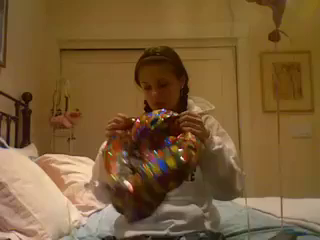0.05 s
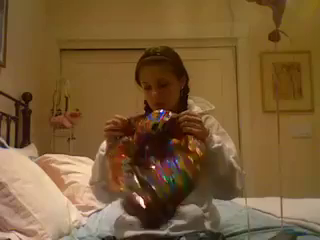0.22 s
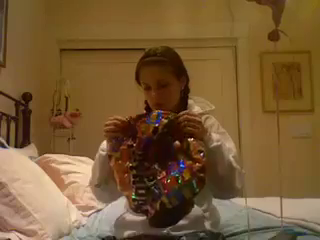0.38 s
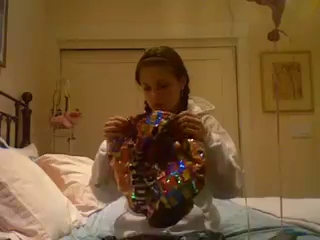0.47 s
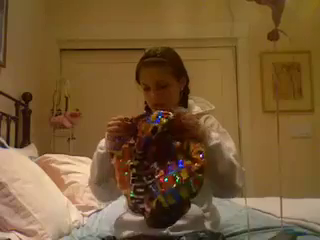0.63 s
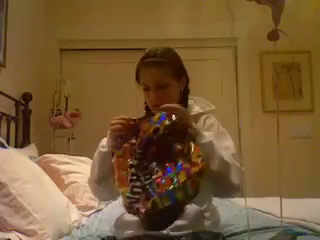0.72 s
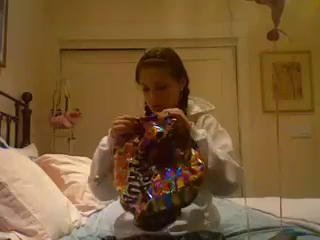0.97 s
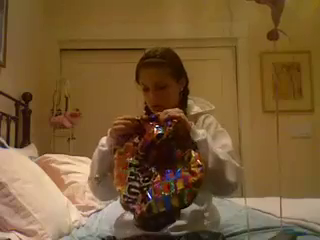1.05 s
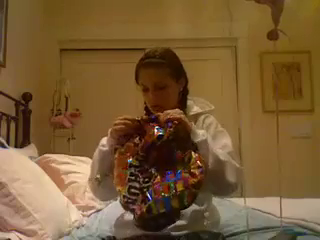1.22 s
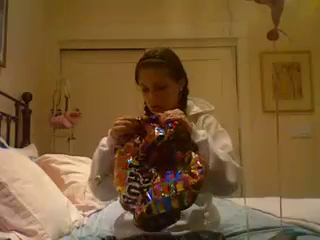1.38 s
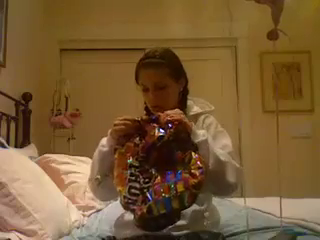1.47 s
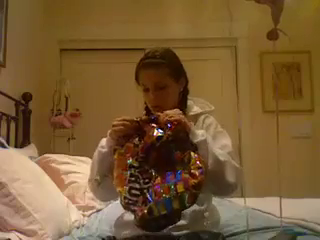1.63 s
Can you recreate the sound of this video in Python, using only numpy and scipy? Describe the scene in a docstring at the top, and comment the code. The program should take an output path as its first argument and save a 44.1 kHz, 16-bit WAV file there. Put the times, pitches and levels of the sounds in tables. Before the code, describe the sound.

Close, bright crinkling comes from a limp foil balloon being turned over in a small bedroom. Three quick bursts of crackles and snaps thin out to stray ticks, with faint room hiss and a thin, pulsing whine underneath.

```python
"""In a small bedroom, a deflated foil balloon is turned over and squeezed three times, close by.
Creases buckle and release their strain as sharp snaps, over a dense crackle of tiny folds.
Taut facets ping as they relax, and the slack skin rustles and flaps with a soft, low puff.
Underneath lie faint room noise and the thin, pulsing whine of electronics."""
import sys
import numpy as np
from scipy import signal
from scipy.fft import rfft, irfft, next_fast_len
from scipy.io import wavfile
from scipy.ndimage import uniform_filter1d

SR = 44100
rng = np.random.default_rng(int(sys.argv[2]) if len(sys.argv) > 2 else 0)


def wrap_up_sound(samples):
    """Save the sound to the file named by the first command line argument, as 16-bit audio."""
    columns = np.atleast_2d(samples).T
    # keep every value between -1 and 1, then stretch to whole-number steps
    tamed = np.clip(columns, -1, 1)
    steps = np.round(tamed * 32767).astype(np.int16)
    wavfile.write(sys.argv[1], SR, steps)


N = 74970

# Room noise and hiss. Each row: frequency in Hz, relative spectral density in dB.
NOISE_SPECTRUM = [(30, -16), (70, -11), (155, 1), (320, -2.5), (460, -6.5), (2000, -11), (4000, -14.5),
                  (7500, -20), (9500, -28), (13000, -33), (15500, -28)]
# Envelope of the pulsing whine. Each row: time in seconds, level in dB.
WHINE_LEVEL = [(0, -58), (.1, -54.5), (.17, -61.5), (.95, -64.5), (1.25, -58.5), (1.32, -63.5),
               (1.42, -55.5), (1.7, -55.5)]
# Faint wavering tones of the electronics. Each row: frequency in Hz, level in dB.
FAINT_TONES = [(12260, -86), (15230, -94)]
# Bedroom reverberation. Each row: frequency in Hz, 60 dB decay time in seconds, relative level in dB.
REVERBERATION = [(188, 0.093, -9.5), (700, 0.13, -0.5), (2000, 0.28, -8.5), (6700, 0.096, 0.5),
                 (14500, 0.13, -8)]
# How hard the hands crumple the foil. Each row: time in seconds, crackle drive in dB.
SQUEEZE_LEVEL = [(0, -55), (.03, -64), (.06, -79.5), (.222, -67), (.25, -41), (.277, -36), (.335, -37),
                 (.39, -47.5), (.425, -48.5), (.46, -44.5), (.50, -48.5), (.56, -57.5), (.64, -60),
                 (.695, -46.5), (.745, -42), (.772, -37.5), (.80, -46), (.85, -56.5), (.90, -67),
                 (.96, -68.5), (1.024, -78), (1.04, -42), (1.105, -46.5), (1.15, -42), (1.21, -52.5),
                 (1.26, -64), (1.35, -83), (1.7, -75)]
# Rustle of the broad panels. Each row: frequency in Hz, relative level in dB.
RUSTLE_SPECTRUM = [(70, -25), (190, -0.5), (430, -2.5), (720, 0), (900, -7), (1250, -2), (2500, -27.5)]
# Radiation of the foil. Each row: frequency in Hz, relative gain in dB.
FOIL_RADIATION = [(100, -37), (200, -6.5), (450, -24), (720, -8.5), (900, -13), (1400, -13.5), (1800, -0.5),
                  (2700, -1), (3500, -1), (5500, -2), (6900, -2), (9200, -4), (11500, -6.5), (12400, -11),
                  (13500, -10), (16000, -24)]
# The top treble as the foil turns. Each row: time in seconds, gain in dB.
SHEEN_GAIN = [(0, -15), (.22, -15), (.27, 0), (.56, 5), (.63, -4), (.76, 0.5), (.86, -5), (1.04, -0.5),
              (1.15, 1.5), (1.2, -17), (1.228, 11), (1.29, -6), (1.57, -8)]
# Slack panels flipping. Each row: centre in seconds, level in dB, pitch in Hz, puff width in seconds.
PANEL_FLAPS = [(0.28, -34, 650, 0.00092), (0.29, -50, 594, 0.0063), (0.305, -41, 404, 0.016),
               (0.3337, -41.5, 217, 0.021), (0.34, -44, 700, 0.0011), (.352, -46, 176, 0.0099),
               (.708, -48.5, 556, 0.012), (0.762, -41, 570, 0.003), (0.766, -39.5, 464, 0.019),
               (.775, -53, 240, 0.014), (1.141, -53, 573, 0.026), (1.671, -56.5, 436, 0.015)]
# Taut facets relaxing. Each row: start in seconds, level in dB, pitch in Hz.
FACET_PINGS = [(.091, -45.5, 3400), (.091, -51.5, 9350), (.186, -49, 4800), (.893, -49, 6430),
               (1.5415, -50, 5240), (1.574, -43, 5100), (1.573, -60, 5700), (1.574, -55, 4300)]
# Creases buckling. Each row: start in seconds, relative level in dB, ring pitch in Hz,
# ring relative to the rattle in dB, gain of the rattle's lower band in dB.
CREASE_SNAPS = [(.003, -21.5, 3180, -10, -17), (.0052, -28.5, 4150, -14, -3),
                (.0915, -37.5, 3120, -4.5, -3), (0.2231, -41, 6500, 4, 13), (0.2474, -23.5, 2640, -3, 10),
                (0.2689, -21, 2890, 9, -11), (0.2715, -18.5, 4500, -5, -18), (0.2837, -25, 4760, 1, 0),
                (0.2971, -17.5, 7250, -6, -6), (0.32, -32, 9400, 5, -11), (0.325, -32, 2420, 3, 2),
                (0.3279, -20, 5000, -24, 1), (0.339, -22.5, 6750, 7, 4), (0.345, -29, 6640, 6, -7),
                (0.3633, -19.5, 2830, -13, 5), (0.3738, -30, 2070, 5, -19), (0.3999, -23, 2620, 8, -8),
                (0.4077, -28, 6900, -1, 3), (0.44, -21, 6200, -17, -1), (0.4488, -20, 7700, -13, -3),
                (0.4552, -20.5, 8700, -4, -2), (0.4628, -20.5, 2670, -7, -3), (.4676, -18, 2860, -3, -27),
                (0.4853, -16, 2370, -6, 0), (0.4922, -20, 5400, -9, 1), (0.5135, -24.5, 3960, -1, -10),
                (.547, -29.5, 6950, -17, -9), (.556, -30, 5400, 0, -6), (.577, -14.5, 7400, -7.5, -6.5),
                (0.5837, -30, 2900, -1, -18), (.59, -18, 8900, -1.5, -6), (.6147, -26, 4230, -9, -4),
                (0.6381, -22.5, 2700, -4.5, -26), (.6524, -18.5, 7330, 6, -2), (.665, -26, 1920, 9, -9),
                (0.665, -15.5, 6770, -3.5, -3.5), (.7005, -20, 6900, -13, 3), (0.7118, -24, 2650, 0, 3),
                (0.7398, -34, 6800, 1, -16), (.7569, -7, 9200, -8, -7), (0.7685, -12, 7500, -23, -13),
                (0.821, -27, 3800, -10, -7), (.832, -32.5, 3440, -1, -10), (.847, -32.5, 4070, 4, -18),
                (0.8544, -36.5, 3480, 14, -23), (.857, -33.5, 4760, 16, -5),
                (1.029, -23.5, 2210, -4.5, -30), (1.0361, -16.5, 5700, -8, -1.5),
                (1.048, -36, 3540, -12, -2), (1.056, -27.5, 2920, 8, -2), (1.066, -22, 6640, -5, -3),
                (1.083, -29, 2980, 6, -6), (1.0944, -19.5, 4400, -21, -5), (1.1188, -26, 2820, 2, 13),
                (1.128, -34, 2800, -6, 12), (1.1402, -26, 2760, 3, 13), (1.1437, -37, 2650, -1, 10),
                (1.1555, -26, 6070, -10, 2), (1.194, -30, 4600, -3, 12), (1.225, -29, 9600, -19, -11),
                (1.279, -38.5, 8800, 15, -8), (1.306, -44, 2600, -5.5, 3), (1.5405, -32.5, 8130, -2, -22),
                (1.5735, -29.5, 7600, -1, -15), (1.5747, -26, 8840, -4, -12)]

FIRM_SQUEEZE_DB = -36  # reference for the squeeze level


def from_db(db):
    """Decibels to amplitude ratio."""
    return 10 ** (np.asarray(db) / 20)


def unit_rms(x):
    """Scale to unit mean power."""
    return x / np.sqrt(np.mean(x ** 2) + 1e-20)


def unit_energy(x):
    """Scale to unit total energy."""
    return x / np.linalg.norm(x)


def in_time(rows):
    """Interpolate a time curve at every sample."""
    return np.interp(np.arange(N) / SR, *np.transpose(rows))


def at_hz(rows, hz, column=1):
    """Interpolate a column on a log-frequency axis."""
    columns = np.transpose(rows)
    return np.interp(np.log(hz + 1e-3), np.log(columns[0]), columns[column])


def butter(x, hz, kind, order=2):
    """Butterworth filter: a maximally flat passband."""
    return signal.sosfilt(signal.butter(order, hz, kind, fs=SR, output="sos"), x + 1e-18)


def crossover(x, hz, order=2):
    """Filtering twice splits a signal into low and high bands that stay in phase."""
    return [butter(butter(x, hz, kind, order), hz, kind, order) for kind in ("low", "high")]


def colour(x, spectrum):
    """Minimum-phase filter of unit power gain: folding the cepstrum makes it causal."""
    size = 2 * next_fast_len(N)
    gain = unit_rms(from_db(at_hz(spectrum, np.arange(size // 2 + 1) * SR / size)))
    cepstrum = irfft(np.log(gain))
    cepstrum[1:size // 2] *= 2
    cepstrum[size // 2 + 1:] = 0
    return irfft(rfft(x, size) * np.exp(rfft(cepstrum)))[:N]


def decay(t, t60):
    """Exponential damping, by 60 dB in t60 seconds."""
    return np.exp(-np.log(1000) * t / t60)


def mode_pair(t, hz, ratio=0.94):
    """Two close modes of a facet interfere and beat."""
    return sum(np.sin(2 * np.pi * hz * ratio ** k * t) for k in (-.5, .5))


def room_noise():
    """Stationary random noise, strongest in the bass, forms the floor."""
    return from_db(-67.5) * colour(rng.standard_normal(N), NOISE_SPECTRUM)


def electronics(whine_hz=8000, period_s=.05846, start_s=.0255, on_s=.0315, waver_hz=45.3):
    """Amplitude modulation: a whine is gated about 17 times a second, and two fainter tones waver."""
    t = np.arange(N) / SR
    switched_on = (t - start_s) % period_s < on_s
    gate = uniform_filter1d(switched_on * 1., size=180)
    out = from_db(in_time(WHINE_LEVEL)) * gate * np.sin(2 * np.pi * whine_hz * t)
    for hz, db in FAINT_TONES:
        waver = 1 + 0.44 * unit_rms(butter(rng.standard_normal(N), waver_hz, "low"))
        out += from_db(db) * waver * np.sin(2 * np.pi * hz * t)
    return out


def bedroom(x, early_db=-11.5, tail_db=-10, first_echo_s=0.0019):
    """Reflection: bright early echoes from balloon and body, and a tail that lasts longest near 2 kHz."""
    t, tail = np.arange(SR // 2) / SR, 0
    edges_hz = np.geomspace(80, 18000, 9)
    for lo, hi in zip(edges_hz, edges_hz[1:]):
        hz = np.sqrt(lo * hi)
        band = from_db(at_hz(REVERBERATION, hz, column=2)) * butter(rng.standard_normal(len(t)), [lo, hi], "band")
        tail += band * decay(t, at_hz(REVERBERATION, hz))
    early = butter(rng.standard_normal(len(t)), 1240, "high") * decay(t, t60=0.024)
    arrived = t > first_echo_s
    response = from_db(early_db) * unit_energy(early * arrived)
    response += from_db(tail_db) * unit_energy(tail * arrived)
    return x + signal.fftconvolve(x, response)[:N]


def rustle(firm_db=-57):
    """The skin's broad panels radiate a dull, slightly hollow noise that follows the squeeze."""
    noise = unit_rms(colour(rng.standard_normal(N), RUSTLE_SPECTRUM))
    return from_db(firm_db + 0.45 * (in_time(SQUEEZE_LEVEL) - FIRM_SQUEEZE_DB)) * noise


def flaps(puff_db=-11.5, band_ratio=1.78, pop_width_cycles=0.86):
    """Air displacement: a slack panel flips with a hollow pop of a few cycles and pushes a soft puff."""
    t, out = np.arange(N) / SR, np.zeros(N)
    for centre, db, hz, width in PANEL_FLAPS:
        cycles = hz * (t - centre)
        pop = np.sin(2 * np.pi * cycles) * np.exp(-.5 * (cycles / pop_width_cycles) ** 2)
        air = unit_rms(butter(rng.standard_normal(N), [hz / band_ratio, hz * band_ratio], "band"))
        puff = air * np.exp(-.5 * ((t - centre) / width) ** 2)
        out += from_db(db) * (pop + from_db(puff_db) * puff)
    return out


def pings(attack_s=0.00046):
    """Free vibration: a taut facet flips without a crack and rings briefly in two close modes."""
    out = np.zeros(N)
    for start, db, hz in FACET_PINGS:
        t = np.maximum(np.arange(N) / SR - start, 0)
        envelope = (1 - np.exp(-t / attack_s)) * decay(t, t60=0.044)
        out += from_db(db) * envelope * mode_pair(t, hz) / 2
    return out


def radiate(x, sheen_hz=11200):
    """Radiation from the foil favours the treble; the very top comes and goes as it is turned."""
    low, high = crossover(colour(x, FOIL_RADIATION), sheen_hz)
    return low + from_db(in_time(SHEEN_GAIN)) * high


def crackle(firm_folds_per_s=5500, ring_cycles=7, large_fold_hz=1556, clump_s=0.003):
    """A random impulse train: tiny folds flip and ring in clumps, more and louder as the squeeze grows."""
    squeeze_db = in_time(SQUEEZE_LEVEL)
    clump_db = 2 * unit_rms(uniform_filter1d(rng.standard_normal(N), int(clump_s * SR)))
    drive = from_db(squeeze_db + clump_db)
    rate = firm_folds_per_s * (drive / from_db(FIRM_SQUEEZE_DB)) ** .35
    size_db = 3 * np.minimum(rng.exponential(1, N), 4)
    sizes = unit_rms(from_db(size_db) * rng.choice([-1, 1], N))
    flips = rng.random(N) < rate / SR
    clicks = sizes * flips * np.sqrt(SR / rate) * drive  # rms follows the drive at any rate
    pitches_hz = np.linspace(1800, 15000, 20)
    pitch_index = rng.integers(0, len(pitches_hz), N)
    t, out = np.arange(SR // 100) / SR, np.zeros(N)
    for k, hz in enumerate(pitches_hz):
        ring = np.cos(2 * np.pi * hz * t) * decay(t, ring_cycles / hz)
        out += signal.fftconvolve(clicks * (pitch_index == k), unit_energy(ring))[:N]
    # One click in twenty also rings a large fold, heard only under a firm squeeze.
    large_gain = from_db(squeeze_db - FIRM_SQUEEZE_DB - 1.5)
    large_clicks = clicks * (pitch_index == len(pitches_hz) - 1) * large_gain
    large_ring = np.sin(2 * np.pi * large_fold_hz * t) * decay(t, 2 * ring_cycles / large_fold_hz)
    return out + signal.fftconvolve(large_clicks, unit_energy(large_ring))[:N]


def snaps(rattle_s=0.002, crack_db=-4.5, split_hz=3940):
    """Buckling: a crease gives way with a crack and a brief rattle, and sets its facet ringing."""
    t, out = np.arange(SR // 40) / SR, np.zeros(N + SR)
    for start, db, hz, ring_db, low_db in CREASE_SNAPS:
        burst = rng.choice([-1, 1], len(t)) * np.exp(-(t / rattle_s) ** 2)
        burst[0] += from_db(crack_db) * np.linalg.norm(burst)  # the crack is one impulse
        low, high = crossover(burst, split_hz, order=4)
        rattle = unit_rms(high + from_db(low_db) * low)
        ring_t60 = 0.0092 * (split_hz / hz) ** 0.81  # higher modes die sooner
        ring = unit_rms(butter(mode_pair(t, hz) * decay(t, ring_t60), hz / np.sqrt(2), "high"))
        snap = butter(rattle + from_db(ring_db) * ring, 1180, "high", order=4)
        i = int(start * SR)
        out[i:i + len(t)] += 2 * from_db(db) * unit_energy(snap)
    return out[:N]


def scene():
    """Superposition: snaps and crackle come from different spots, each with its own reflections."""
    creases, folds = radiate(snaps()), radiate(crackle())
    balloon = bedroom(creases) + bedroom(folds + pings() + flaps() + rustle())
    return (balloon + electronics() + room_noise())[None]


def record(dry):
    """Band limiting: a small microphone loses the deep bass, and a steep low-pass cuts the top."""
    low_pass = signal.cheby2(12, 60, 16700, fs=SR, output="sos")
    return signal.sosfilt(low_pass, butter(dry, 90, "high"))


dry = scene()
out = record(dry)
wrap_up_sound(out)
```